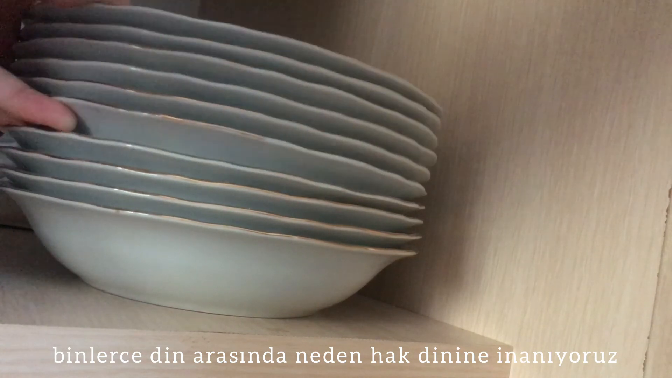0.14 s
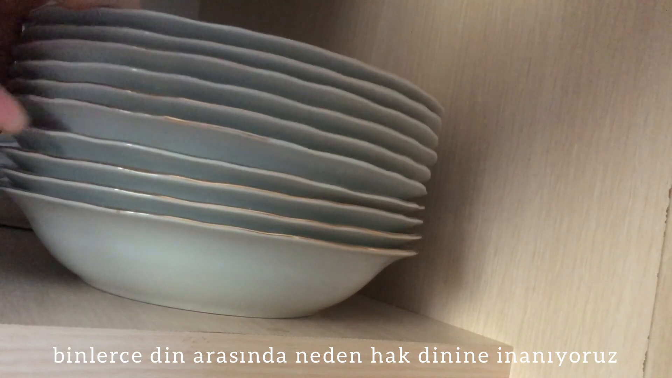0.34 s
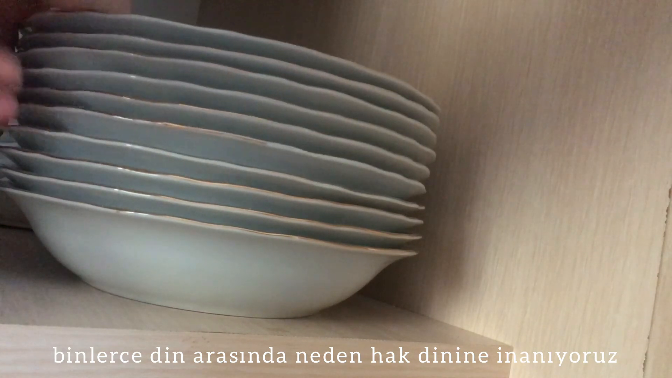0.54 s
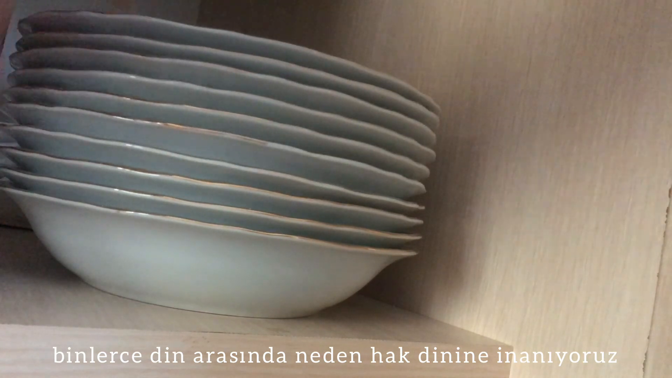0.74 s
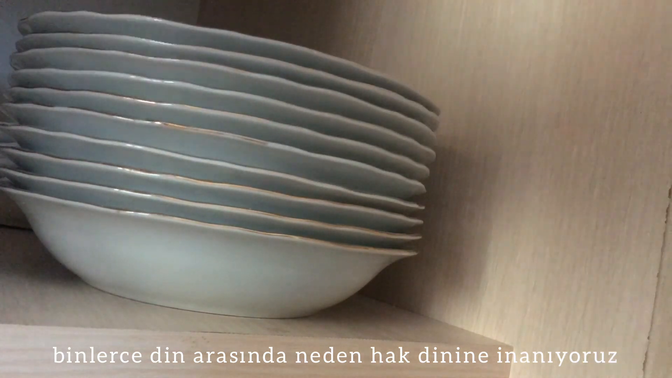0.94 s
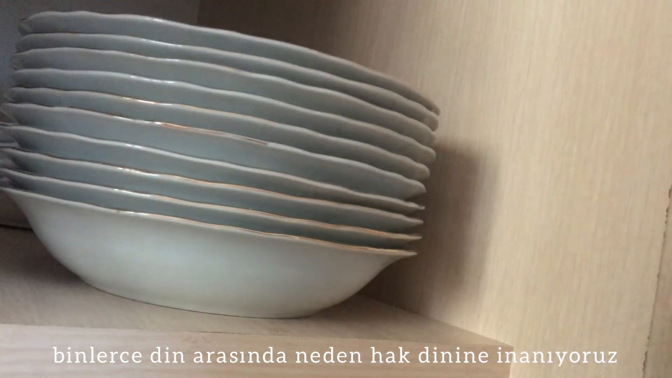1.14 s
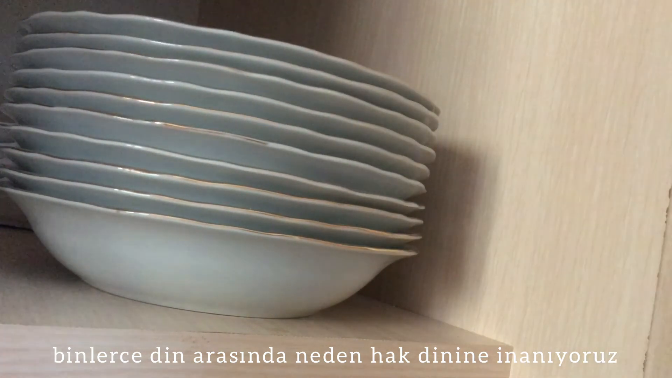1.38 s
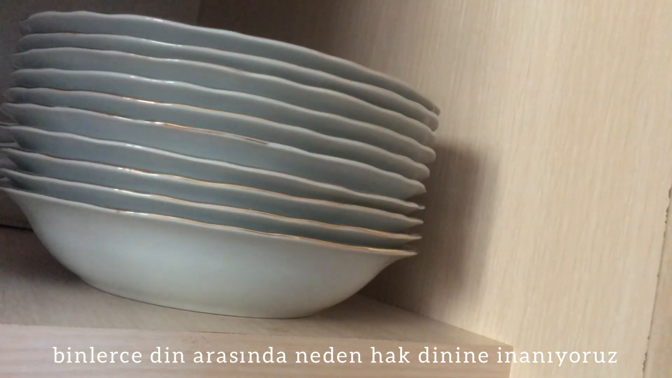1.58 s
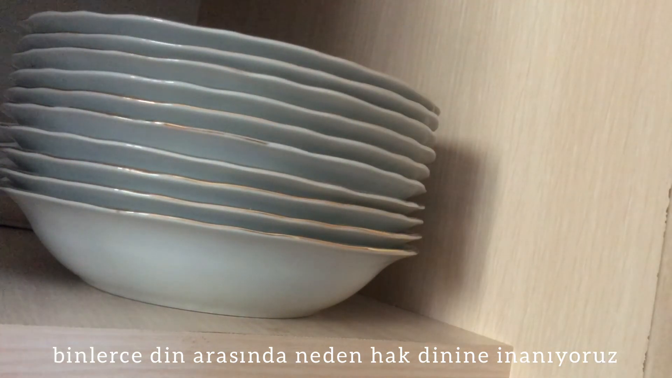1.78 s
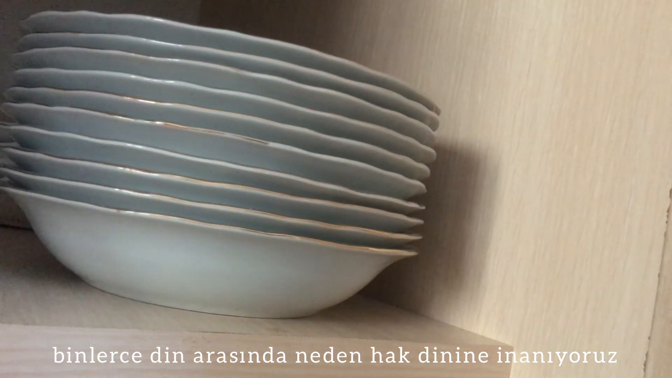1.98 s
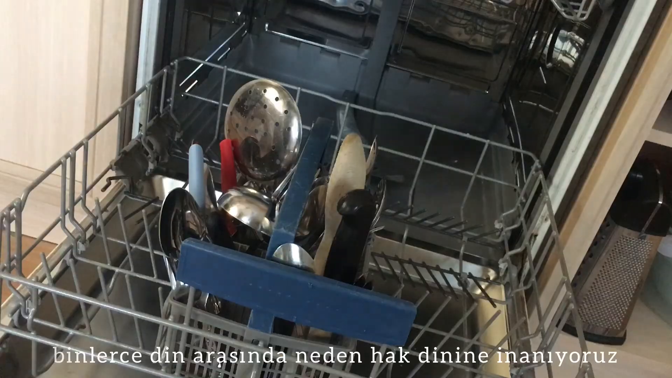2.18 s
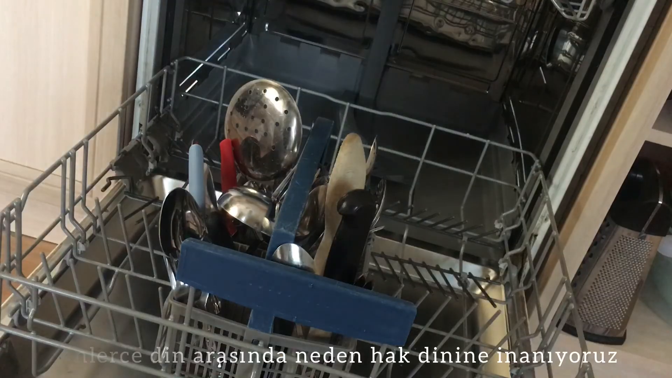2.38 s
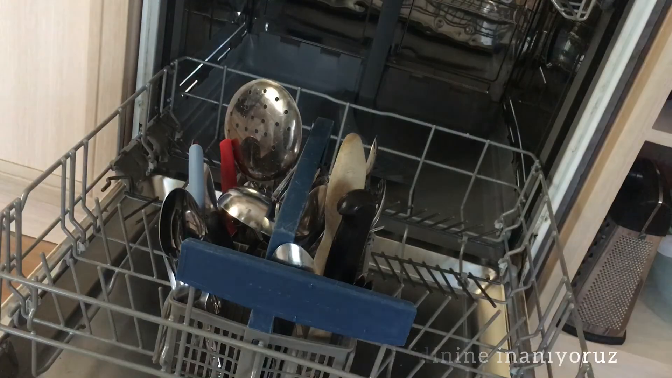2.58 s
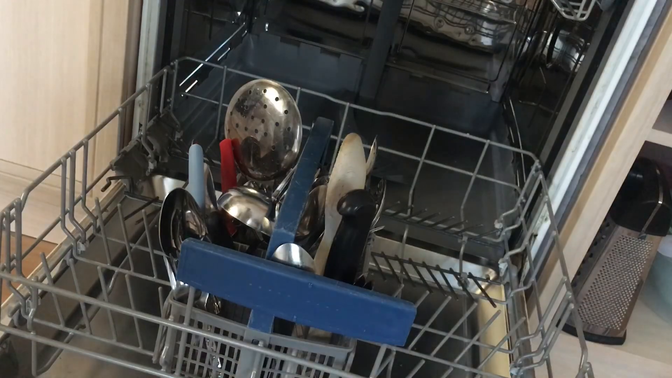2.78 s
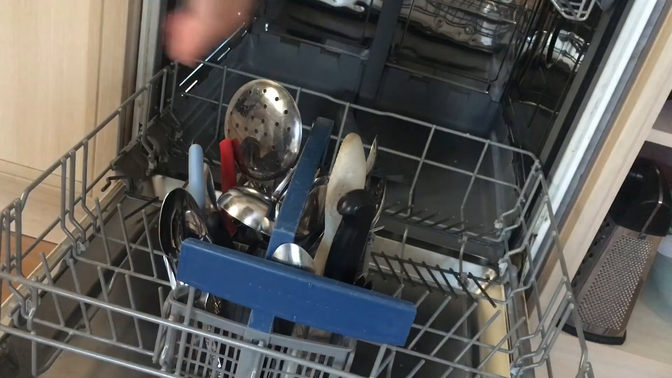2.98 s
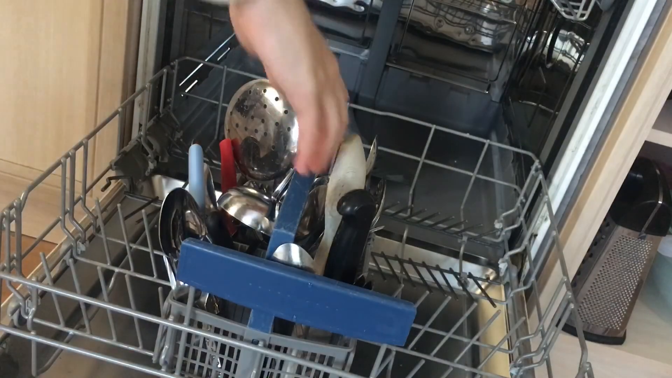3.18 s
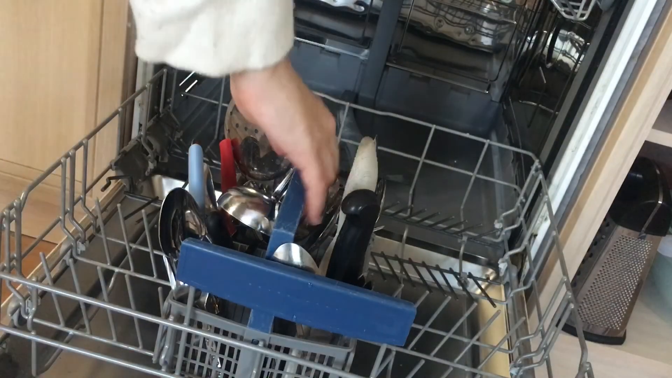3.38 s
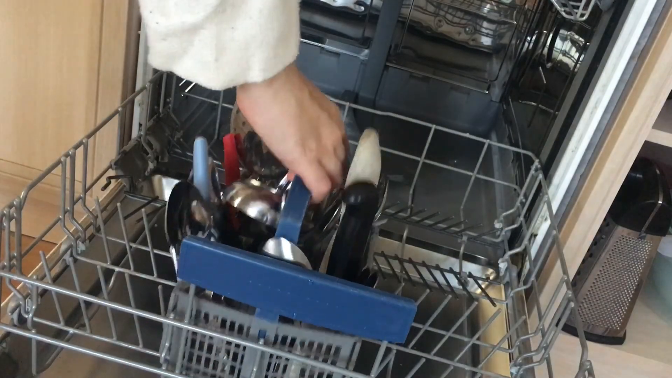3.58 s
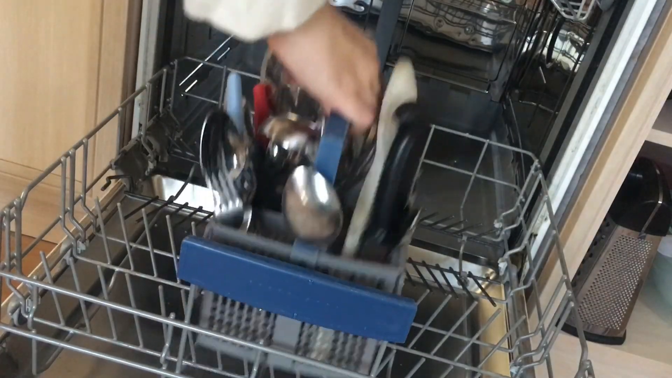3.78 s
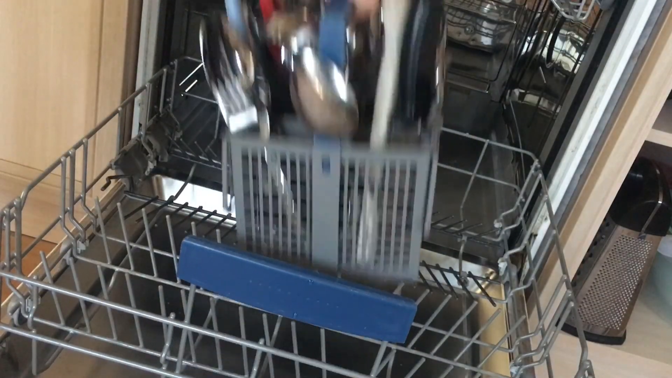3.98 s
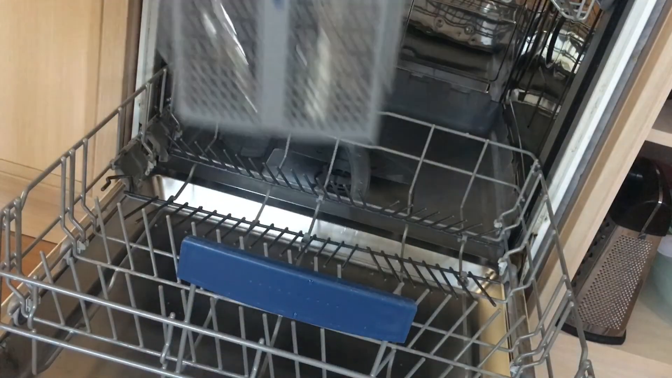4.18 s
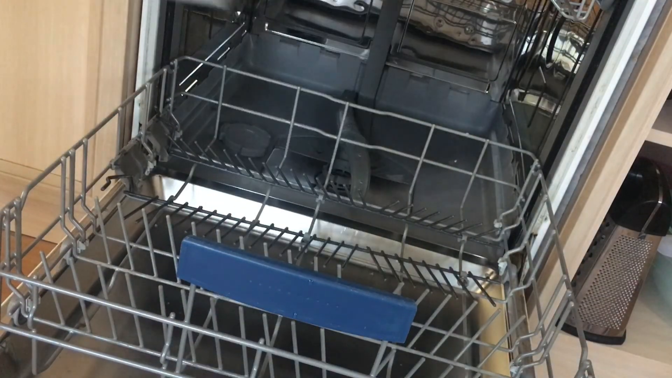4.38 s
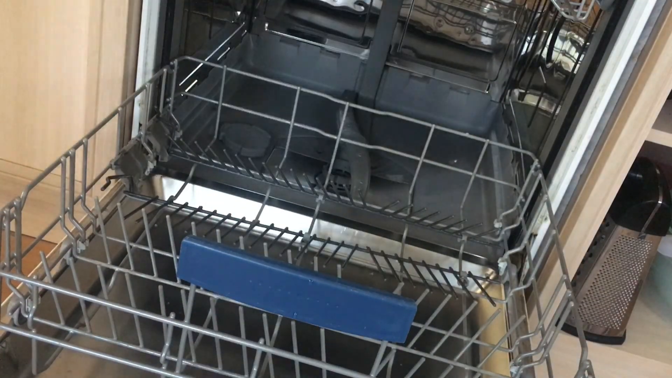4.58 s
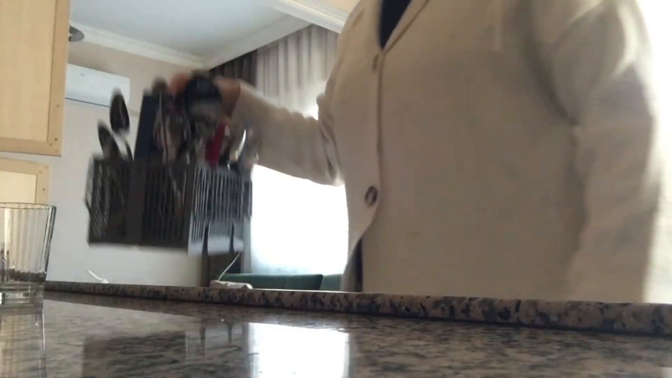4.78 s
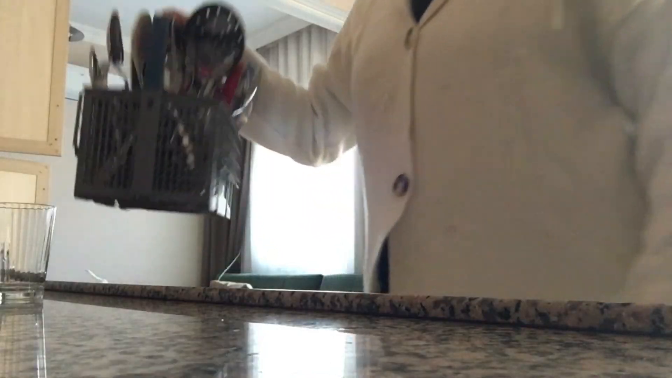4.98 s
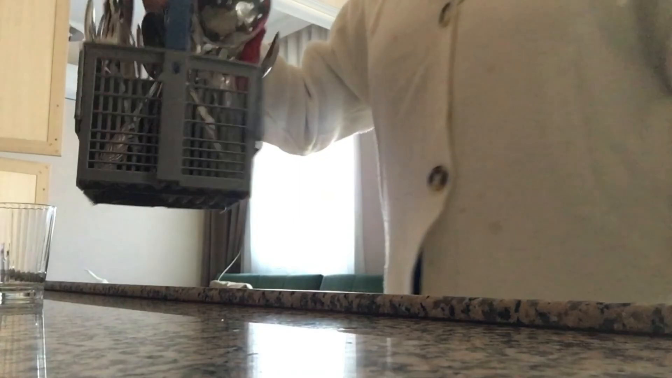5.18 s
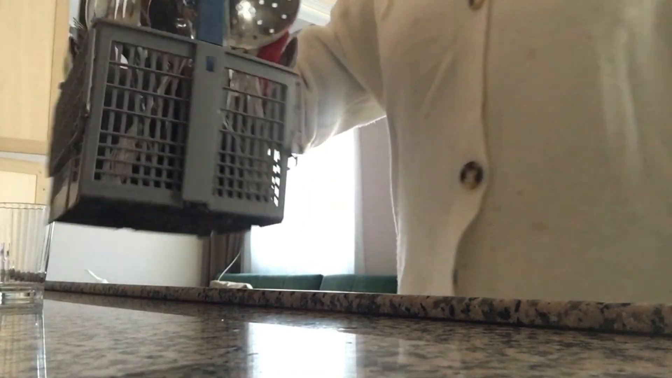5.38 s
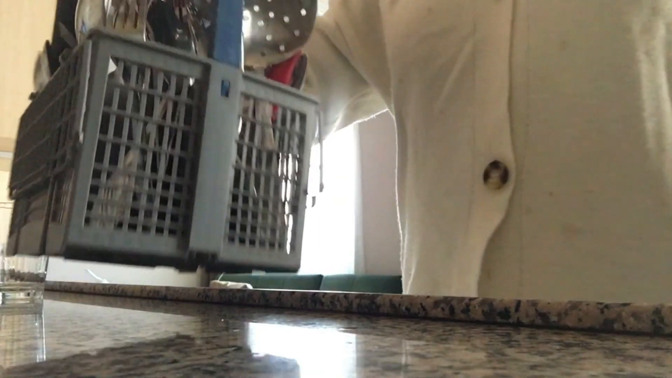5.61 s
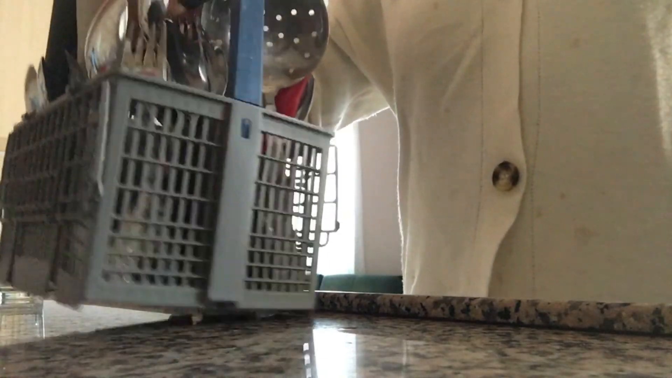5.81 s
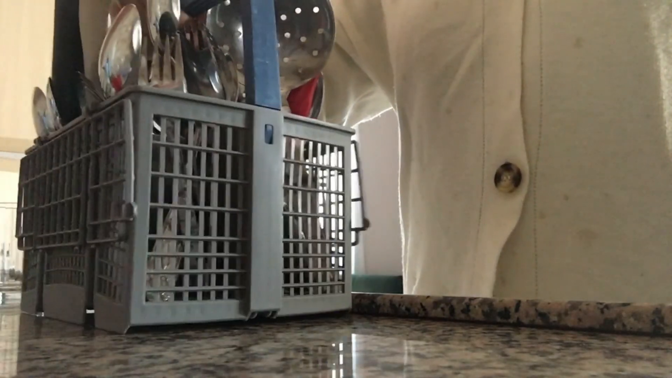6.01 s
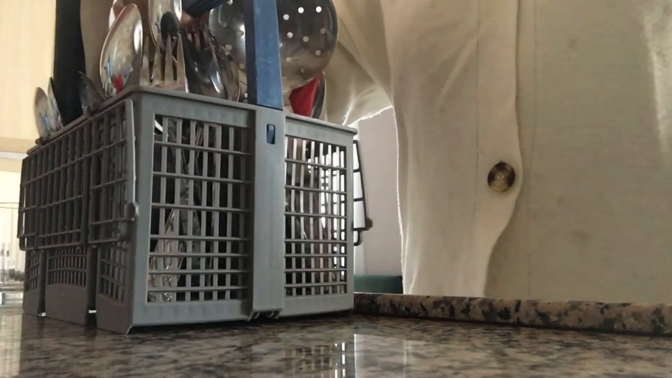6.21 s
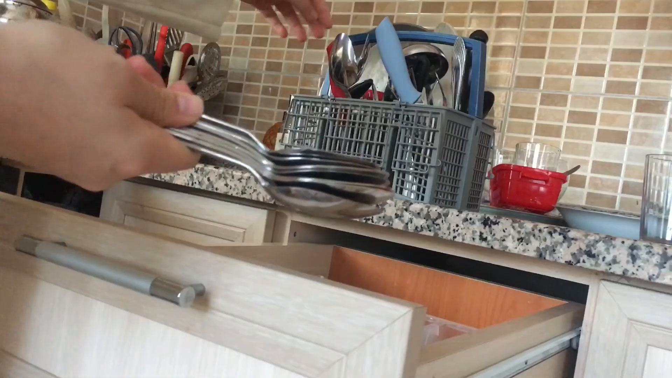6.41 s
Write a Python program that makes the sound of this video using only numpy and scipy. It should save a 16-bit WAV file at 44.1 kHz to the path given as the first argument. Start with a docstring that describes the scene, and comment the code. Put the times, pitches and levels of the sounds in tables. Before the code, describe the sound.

Close kitchen chores: stacked bowls clatter and settle, a quiet pause, then cutlery clinks in a plastic basket lifted and set down on a worktop.

```python
"""Kitchen chores: a stack of china bowls settles on a wooden cupboard shelf, then a plastic basket of cutlery
is pulled from the dishwasher rack and set down on a stone worktop, over the hum of a fridge.
Each blow is a noisy crack, a clatter of many short modes and the ringing modes of one piece; shelf or
basket adds a low thump. Rubbing, the shudder of the rack and the air are coloured noise; the hum is two
harmonics. A diffuse tail of a small, hard room follows the blows, heard close by at each place."""
import sys
import numpy as np
from scipy import signal
from scipy.fft import rfft, irfft
from scipy.io import wavfile
from scipy.ndimage import uniform_filter1d

SR = 44100
rng = np.random.default_rng(int(sys.argv[2]) if len(sys.argv) > 2 else 0)


def to_wav(s):
    """Save 16-bit WAV."""
    ch = np.atleast_2d(s).T  # columns
    pcm = np.round(np.clip(ch, -1, 1) * 32767)  # PCM
    wavfile.write(sys.argv[1], SR, pcm.astype(np.int16))


N = 284445
T = np.arange(N) / SR
TOP_HZ = 16000  # upper limit of the modes and of the whole sound


def undb(db):
    """Decibel law: 20 dB is a factor of ten in amplitude."""
    return 10 ** (np.asarray(db) / 20)


def unit(x):
    """Normalisation by mean power: scale to rms 1."""
    return x / np.sqrt(np.mean(x ** 2))


def decay(t, t60):
    """Exponential decay: the amplitude falls by 60 dB in t60 seconds."""
    return np.exp(-np.log(1000) * t / t60)


def along(points, hz):
    """Interpolation on a logarithmic frequency axis through points of (frequency_hz, value)."""
    f, value = np.transpose(points)
    return np.interp(np.log(np.maximum(hz, 1)), np.log(f), value)


def octaves(hz, centre):
    """Logarithmic pitch scale: signed distance from a centre frequency in octaves."""
    return np.log2(np.maximum(hz, 20) / centre)


def tint(x, colour, tilt_db=0):
    """Linear filtering: weight the spectrum by a colour and a tilt in dB per octave above 406 Hz; rms 1."""
    hz = np.fft.rfftfreq(len(x), 1 / SR)
    weight_db = along(colour, hz) + tilt_db * np.maximum(octaves(hz, 406.2), 0)
    return unit(irfft(rfft(x) * undb(weight_db), len(x)))


def walk(rate):
    """Slow random modulation: smoothed random steps, rate per second, with rms 1."""
    step = int(SR / rate)
    held = np.repeat(rng.standard_normal(N // step + 1), step)
    return unit(uniform_filter1d(held, step)[:N])


def room_tone():
    """Stationary background: coloured air noise and fridge harmonics, both new in balance at each place."""
    # start and end moments of the stretches: time_s
    moments = [0, 2.07, 4.618, 6.387, 7]
    # levels at cupboard, dishwasher, worktop and in the closing hush: air_db, third_harmonic_db, fourth_harmonic_db
    levels = [(-55, -71, -60.5), (-56.5, -58, -60.5), (-55, -50.5, -70.5), (-63, -76, -83)]
    # relative spectra of the air noise: frequency_hz, density_db
    cupboard_air = [(42, -14.5), (58, -0.5), (92, 2), (130, -11), (198, -15), (280, -4.5), (380, -22.5),
                    (580, -19.5), (900, -25.5), (3000, -37), (16000, -46)]
    dishwasher_air = [(25, -22), (60, 3), (110, -5), (200, 2.5), (280, -3.5), (380, -12), (700, -17.5),
                      (4000, -33.5), (16000, -40.5)]
    worktop_air = [(45, -9), (65, 1.5), (90, 5), (125, -1), (190, -13), (280, -10.5), (480, -18.5),
                   (700, -12.5), (900, -19), (1200, -21.5), (2000, -33), (16000, -47.5)]
    colours = [cupboard_air, dishwasher_air, worktop_air, worktop_air]
    fridge_hz = 49.28 * (1 + 0.00083 * walk(3.4))
    turn = 2 * np.pi * np.cumsum(fridge_hz) / SR
    third, fourth = np.sin(3 * turn), np.sin(4 * turn)
    out = 0
    for start, end, (air_db, third_db, fourth_db), colour in zip(moments, moments[1:], levels, colours):
        hum = undb(third_db + .5 * walk(18)) * third + undb(fourth_db + 3.5 * walk(41)) * fourth
        air = undb(air_db + .5 * walk(2.5)) * tint(rng.standard_normal(N), colour)
        present = 1. * ((T >= start) & (T < end))
        out = out + (air + np.sqrt(2) * hum) * uniform_filter1d(present, size=200)  # short crossfade
    return out


def swell(s, width_s):
    """Friction follows speed: the envelope of a slide rises until about s, then falls more gently."""
    release_ratio = 1.42  # stopping takes this much longer than starting
    u = (T - s) / width_s
    return 2 * np.exp(-np.logaddexp(-u, u / release_ratio))


def rubbing():
    """Stick-slip friction: uneven slips of cloth and plastic; the wire rack shudders as the basket comes free."""
    # rubs of sleeve, wire rack and basket: full_speed_s, width_s, level_db, tilt_db_per_octave
    slides = [(2.145, 0.03, -59.5, -3.5), (2.332, 0.011, -65, -2.5), (2.85, 0.14, -74, 1),
              (3.143, 0.027, -60, -2.5), (3.22, 0.021, -65, 9), (3.539, 0.069, -53.5, -4.5),
              (3.745, 0.024, -55.5, 5), (6.32, 0.01, -62, 2.5)]
    # relative spectra of rubbing and of the shuddering rack: frequency_hz, level_db
    rub_colour = [(200, -9), (900, -6.5), (2000, 2), (6000, 3.5), (10500, -6.5), (16000, -18.5)]
    shudder_colour = [(140, -9.5), (190, 3), (255, -2), (330, -19.5), (700, -26), (3000, -68.5)]
    pull_s, pull_width_s, shudder_db = 3.736, 0.14, -46.5
    slips = rng.standard_normal(N) * undb(2.2 * walk(400))
    scrape = 0
    for s, width_s, db, tilt_db in slides:
        scrape = scrape + tint(slips, rub_colour, tilt_db) * undb(db) * swell(s, width_s)
    shudder = tint(rng.standard_normal(N), shudder_colour) * undb(shudder_db) * swell(pull_s, pull_width_s)
    return scrape + shudder


def ring(modes, t, weight_db=0, scatter_db=2.5):
    """Modal superposition: damped sines whose shares vary with where each blow lands; fixed total power."""
    hz, db, t60 = np.transpose(modes)
    level_chance, pitch_chance, phase_chance = rng.standard_normal((len(hz), 3)).T
    gain = undb(db + weight_db + scatter_db * level_chance)
    gain = gain / np.sqrt(np.sum(gain ** 2) / 2)
    phase = 2 * np.pi * (np.outer(hz * (1 + 0.0013 * pitch_chance), t) + phase_chance[:, None])
    return gain @ (np.sin(phase) * decay(t, t60[:, None]))


def crowd(gap_hz, size):
    """High modal density: many partials at uneven spacing, each with random strength and phase."""
    place, strength, phase = rng.random((int(TOP_HZ / gap_hz), 3)).T
    bins = (np.arange(len(place)) + 1 + place) * gap_hz * size / SR
    lines = np.zeros(size // 2 + 1, complex)
    lines[bins.astype(int)] = np.sqrt(-np.log(1 - strength)) * np.exp(2j * np.pi * phase)
    return irfft(lines)


def strike(blows, colour, pieces, gap_hz, focus_db, spread, free_db, detune,
           support=None, thump_db=0, size=32768):
    """Impact excitation: a blow cracks, clatters, rings its piece near a centre and may thump a support."""
    crack_share = .55  # the crack lasts this share of the clatter
    ring_damping = 0.27  # higher modes die sooner: t60 falls with this power of frequency
    thump_growth = .6  # dB more thump for each dB of clatter
    out, t = np.zeros(N + size), np.arange(size) / SR
    for s, clatter_db, tilt_db, t60, ring_db, ring_hz, piece in blows:
        contact = decay(t, t60)
        ring_s, partials = pieces[piece]
        modes = [(hz, db, ring_s * (3000 / hz) ** ring_damping) for hz, db in partials]
        crack = tint(rng.standard_normal(size), colour, tilt_db) * contact ** (1 / crack_share)
        jostle = tint(crowd(gap_hz, size), colour, tilt_db) * contact
        clatter = (crack + jostle) * undb(-1.83)
        pitch = 1 + detune * rng.standard_normal()  # shifts with how the piece is wedged
        away = np.abs(octaves(np.transpose(modes)[0], ring_hz))
        tone = ring(modes, t * pitch, -focus_db * away)
        # touching neighbours drain the ring while they rattle
        tone = tone * undb(free_db * (1.5 - np.sqrt(contact)))
        # a long clatter also takes longer to spread from piece to piece
        attack = 1 - np.exp(-t / (spread * t60))
        sound = attack * (undb(clatter_db) * clatter + undb(ring_db) * tone)
        if support:
            late = 1 - np.exp(-t / .005)  # the heavy support answers late
            sound = sound + undb(thump_db + thump_growth * clatter_db) * ring(support, t) * late
        start = max(int(s * SR), 0)
        out[start:start + size] += sound
    return out[:N]


def kitchen(x, wet_db, treble_db, size=32768):
    """Diffuse reverberation: convolve with decaying noise; treble_db per octave acts above 1500 Hz."""
    # reverberation time, shorter in the treble: frequency_hz, t60_s
    room_decay = [(100, 1), (500, 0.69), (1500, 0.64), (4000, 0.46), (8000, .36), (16000, .22)]
    t, hz = np.arange(size) / SR, np.fft.rfftfreq(size, 1 / SR)
    noise, centres = rfft(rng.standard_normal(size)), np.transpose(room_decay)[0]
    tail = 0
    for share, (centre, t60) in zip(np.eye(len(centres)), room_decay):
        band = irfft(noise * along(np.c_[centres, share], hz))  # overlapping bands
        tail = tail + band * decay(t, t60) * undb(treble_db * max(octaves(centre, 1500), 0))
    tail = tail * (1 - np.exp(-t / 0.0035)) * np.sqrt(20 / SR)
    return x + undb(wet_db) * signal.fftconvolve(x, tail)[:N]


def cutlery():
    """Free bar modes: forks, spoons and other metal pieces jostle in the basket, each with its own ring."""
    # clinks: start_s, clatter_db, tilt_db_per_octave, clatter_t60_s, ring_db, ring_centre_hz, ringing_piece
    clinks = [ (3.3645, -56, 2, .02, -56, 12100, "fork"), (3.3965, -41.5, -1, 0.046, -39.5, 4970, "fork"),
              (3.439, -44.5, -2.5, 0.12, -54, 4200, "fork"), (3.4515, -39.5, -1, 0.097, -38, 11000, "fork"),
              (3.514, -48, -8, 0.052, -50, 8000, "teaspoon"),
              (3.544, -33.5, -3.5, 0.033, -40, 3300, "skimmer"),
              (3.579, -43, -6, 0.052, -42.5, 1900, "skimmer"),
              (3.6228, -39, -1.5, 0.027, -38, 3120, "skimmer"),
              (3.652, -48, -4, 0.025, -57, 5500, "skimmer"),
              (3.682, -43, -5, 0.021, -40.5, 2800, "skimmer"),
              (3.746, -45, -5.5, 0.051, -52, 12000, "teaspoon"),
              (3.7968, -32.5, -1.5, 0.039, -34, 5870, "knife"),
              (3.8185, -37.5, 2, 0.076, -34.5, 10700, "spoon"), (3.821, -46, -8, 0.048, -54, 1760, "tongs"),
              (4.4385, -37.5, -1.5, 0.11, -43, 9400, "teaspoon"),
              (5.816, -29, 1, 0.11, -28.5, 6895, "ladle"), (5.836, -31.5, 1, 0.12, -42.5, 4800, "ladle"),
              (5.9875, -38, -2.5, 0.21, -33.5, 8380, "server"),
              (6.021, -37, -1.5, 0.078, -41, 8250, "server"),
              (6.1725, -45, -2, 0.052, -60, 7000, "teaspoon"),
              (6.340, -47.5, -9.5, 0.09, -58.5, 8100, "fork")]
    # each piece: t60_s at 3 kHz, modes of (frequency_hz, level_db)
    piece_modes = { "fork": (.15, [(4635, -7), (7284, -8), (8670, 0), (9120, 2), (11900, -3), (14810, -5)]),
                   "skimmer": (.12, [(1682, -3), (1927, -1), (2050, -2), (3100, 0), (3363, 0), (4511, -4),
                   (5475, -1)]), "knife": (.25, [(3862, -3), (5791, 1), (5912, -1), (6700, -1), (6968, -3),
                   (9033, -2), (9964, -4)]), "spoon": (.19, [(3530, 2), (8161, 1), (9045, -2), (9964, -6),
                   (12410, 2)]), "tongs": (.9, [(1751, 0)]), "teaspoon": (.15, [(4600, -2), (6745, -2),
                   (9964, -3), (12750, 0), (15260, -1)]), "ladle": (.21, [(4797, -6), (6713, -1), (6880, 0),
                   (7940, 0), (8430, -4), (9986, -2)]), "server": (.22, [(3645, 0), (8150, 3), (9975, -4),
                   (10740, -8), (12780, -7)])}
    # relative spectrum of the clatter: frequency_hz, level_db
    clatter_colour = [(200, -35), (900, 1), (2000, -1.5), (4000, 2.5), (9000, 1), (10700, -5), (12500, 1),
                      (16000, -7)]
    blows = strike(clinks, clatter_colour, piece_modes, gap_hz=160, focus_db=5, spread=.012,
                   free_db=-7, detune=.0005)
    return kitchen(blows, wet_db=-10.5, treble_db=1.0)


def basket():
    """Coupled impact: the plastic basket knocks on the wire rack, then on stone, and its load thumps."""
    # knocks: start_s, clatter_db, tilt_db_per_octave, clatter_t60_s, ring_db, ring_centre_hz, surface_met
    knocks = [ (3.2694, -47.5, 2, 0.11, -45, 1690, "rack"), (3.5275, -39.5, 2, 0.016, -21.5, 1950, "rack"),
              (3.683, -44, -0.5, 0.26, -38, 1720, "rack"), (3.737, -40.5, -1, 0.15, -33, 1690, "rack"),
              (3.764, -43, 1, 0.16, -35, 705, "rack"), (3.799, -40.5, 9.5, 0.21, -37, 705, "rack"),
              (5.8103, -25.5, -4.5, 0.12, -24.5, 770, "stone"), (5.822, -32, -4.5, 0.23, -32, 902, "stone"),
              (5.9505, -32.5, -3.5, 0.27, -28, 1200, "stone"),
              (5.9865, -23.5, -3, 0.1, -27.5, 1690, "stone"), (6.020, -33.5, -3, 0.18, -32, 1100, "stone"),
              (6.0707, -39, -4.5, 0.056, -48, 1004, "stone")]
    # basket against each surface: t60_s at 3 kHz, modes of (frequency_hz, level_db)
    surface_modes = { "rack": (0.065, [(695, 6), (1335, -2), (1744, -1.5), (2000, 0)]),
                     "stone": (0.12, [(318, 2), (538, -1), (700, 1), (875, 1), (1030, 2), (1245, 2),
                     (1523, 0), (1809, 0), (2105, 0)])}
    # relative spectrum of the clatter: frequency_hz, level_db
    clatter_colour = [(100, -8), (400, -7.5), (800, -3.5), (1600, -1.5), (2600, -10.5), (4000, -10.5),
                      (16000, -39)]
    # low modes of the loaded basket: frequency_hz, level_db, t60_s
    load_modes = [(91, -1.5, 0.88), (147.5, 4.5, 0.45), (214, 11.5, 0.21)]
    blows = strike(knocks, clatter_colour, surface_modes, gap_hz=45, focus_db=12, spread=0.022,
                   free_db=-13.0, detune=0.0028, support=load_modes, thump_db=-19)
    return kitchen(blows, wet_db=-10.5, treble_db=-20.0)


def rocking(count=6):
    """Damped rocking: the stack tips to and fro at a nearly even pace, each touch lighter than the last."""
    # first touch of each rocking: start_s, rattle_db, ring_db
    first_touches = [(.060, -43, -51), (.533, -45, -48)]
    gap_s, fall_db = 0.035, 6  # from one touch to the next
    tilt_db, t60_s, ring_hz = -2.5, 0.1, 1600  # brightness per octave, rattle length, ring centre
    touches = []
    for s, rattle_db, ring_db in first_touches:
        for k, late in enumerate(0.16 * rng.standard_normal(count)):
            touch_s = s + (k + late * (k > 0)) * gap_s
            lighter_db = k * fall_db
            touches.append((touch_s, rattle_db - lighter_db, tilt_db, t60_s,
                            ring_db - lighter_db, ring_hz, "top"))
    return touches


def bowls():
    """Shell modes: nested bowls drop onto each other and shake the shelf; their level dips briefly once."""
    # blows: start_s, clatter_db, tilt_db_per_octave, clatter_t60_s, ring_db, ring_centre_hz, ringing_bowl
    drops = [ (.000, -21, -2, 0.038, -31, 4160, "middle"), (.0055, -18.5, -1, 0.1, -18.5, 870, "lower"),
             (.0203, -23.5, -3, 0.069, -30, 4500, "middle"),
             (.2092, -38.5, -2, 0.06, -43.5, 3900, "middle"), (.2535, -37.5, -2, 0.076, -51, 2560, "top"),
             (.2997, -17.5, 3, 0.08, -8.5, 6007, "lower"), (.3043, -14.5, 0, 0.047, -7.5, 645, "lower"),
             (.3335, -24.5, -0.5, 0.13, -17.5, 2900, "middle"),
             (.372, -25.5, -3.5, 0.095, -38, 1510, "top"), (.3765, -29.5, -0.5, 0.058, -37, 1400, "middle"),
             (.473, -40.5, -7.5, 0.18, -48, 900, "lower"), (.492, -35.5, -3.5, 0.039, -45.5, 3520, "top"),
             (.559, -48.5, -2, 0.044, -47.5, 2300, "top"), (1.470, -56, -2.5, 0.036, -67, 3065, "lower")]
    # each bowl: t60_s at 3 kHz, modes of (frequency_hz, level_db); the top bowl is free and rings longest
    bowl_modes = { "lower": (.068, [(570, -2), (646, 3), (690, 3), (752, 5), (938, -1), (1495, -3),
                  (1663, 6), (3076, -4), (4015, -3), (5248, -1), (5411, 4), (5556, -2), (8380, -4),
                  (9100, -7)]), "middle": (.135, [(858, -3), (1098, 1), (1277, -1), (1750, -4), (2396, -5),
                  (2945, 4), (3524, -5), (4199, -3), (4930, -1), (8845, -4)]), "top": (.62, [(1408, 4),
                  (1459, -1), (1877, -5), (2022, -2), (2520, -3), (2750, -5), (3140, -4), (3290, -4),
                  (4526, -4), (5953, -7)])}
    # relative spectrum of the clatter: frequency_hz, level_db
    clatter_colour = [(300, -12), (500, -7), (640, -4), (1000, -3), (2000, -6.5), (3500, -5.5),
                      (5500, -9.5), (6700, -11.5), (7600, -21), (9000, -14.5), (10000, -25.5), (12500, -22),
                      (16000, -30.5)]
    # low modes of the shelf: frequency_hz, level_db, t60_s
    shelf_modes = [(77.5, -8, 0.58), (100.8, -1.5, .55), (123, -4, 0.2), (165.6, -7, 0.44),
                   (199.8, -11, 0.57)]
    dip_s, dip_depth_db, dip_recovery_s = .5175, -39, 0.0073
    blows = strike(drops + rocking(), clatter_colour, bowl_modes, gap_hz=60, focus_db=5.0, spread=0.012,
                   free_db=-9.5, detune=0, support=shelf_modes, thump_db=-24.0)
    dip_db = dip_depth_db * (T >= dip_s) * np.exp(-np.abs(T - dip_s) / dip_recovery_s)
    return kitchen(blows, wet_db=-13.0, treble_db=-2.5) * undb(dip_db)


def scene():
    """Linear superposition: the pressures of all sources add up in one channel."""
    return (room_tone() + rubbing() + cutlery() + basket() + bowls())[None]


def record(dry):
    """Band limitation: a high-pass rolls off the deep bass and a steep low-pass cuts the top."""
    thin = signal.sosfilt(signal.butter(4, 45, "high", fs=SR, output="sos"), dry)
    return signal.sosfilt(signal.ellip(10, .2, 80, TOP_HZ, fs=SR, output="sos"), thin)


dry = scene()
out = record(dry)
to_wav(out)
```